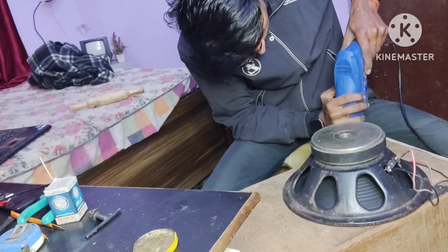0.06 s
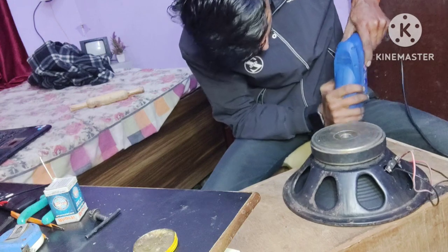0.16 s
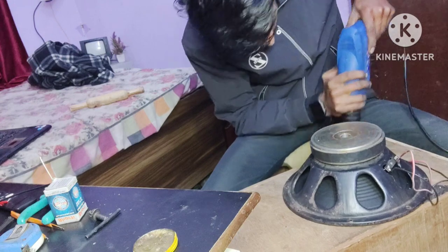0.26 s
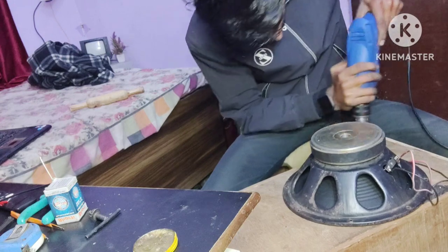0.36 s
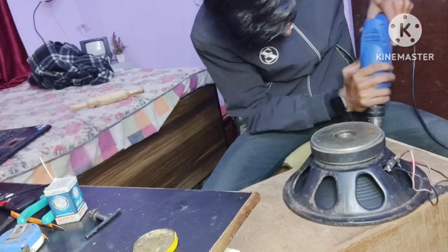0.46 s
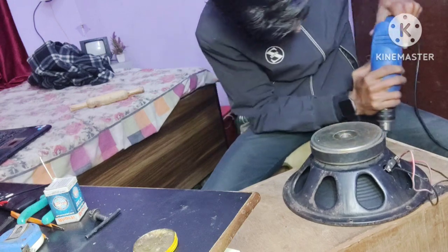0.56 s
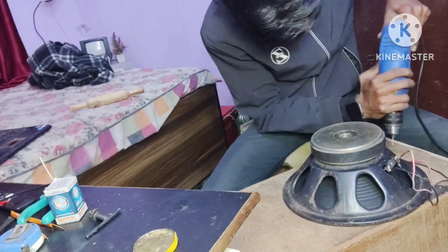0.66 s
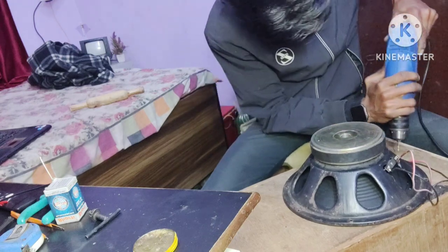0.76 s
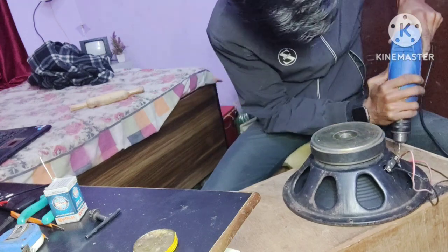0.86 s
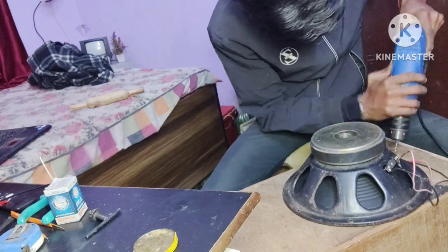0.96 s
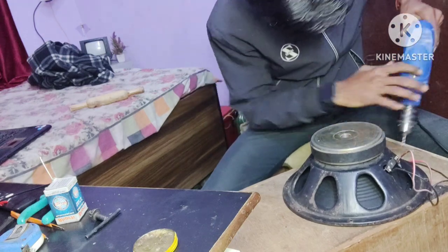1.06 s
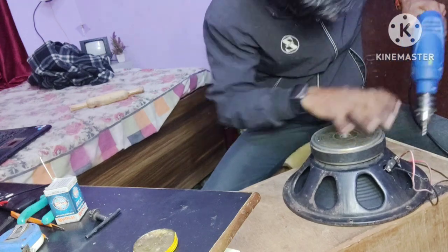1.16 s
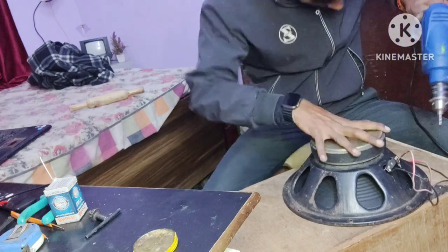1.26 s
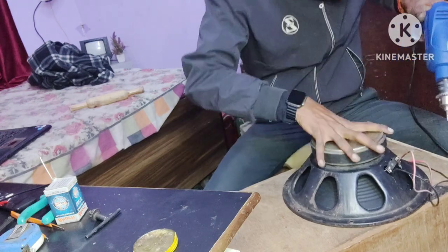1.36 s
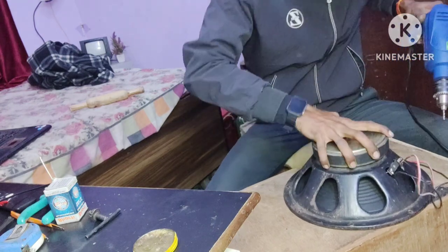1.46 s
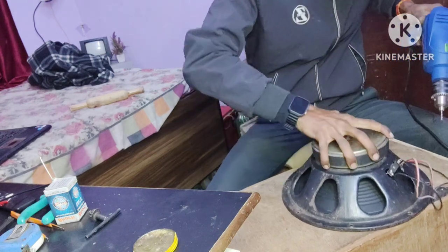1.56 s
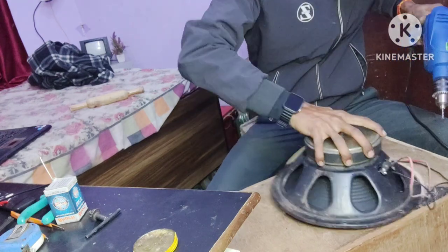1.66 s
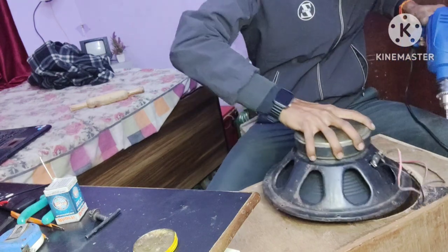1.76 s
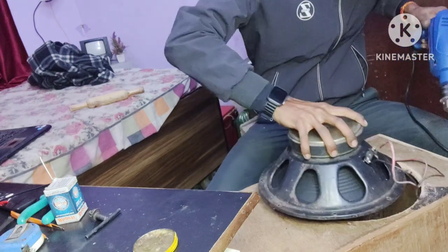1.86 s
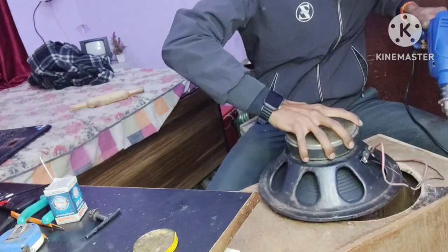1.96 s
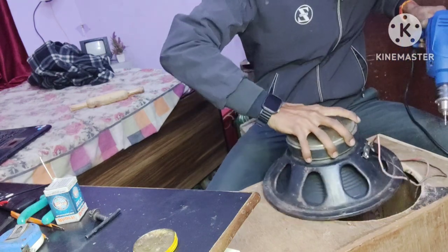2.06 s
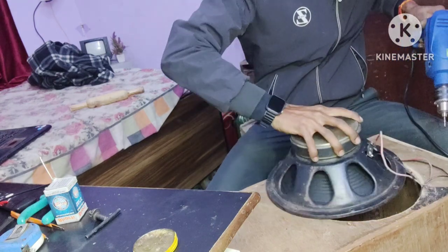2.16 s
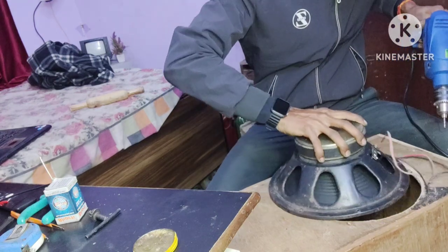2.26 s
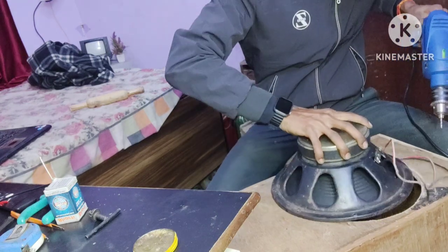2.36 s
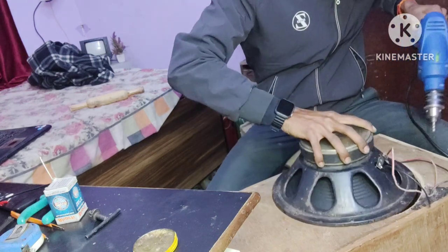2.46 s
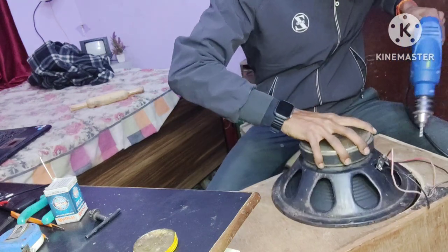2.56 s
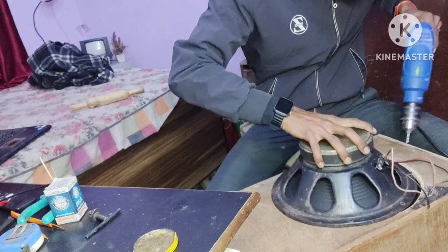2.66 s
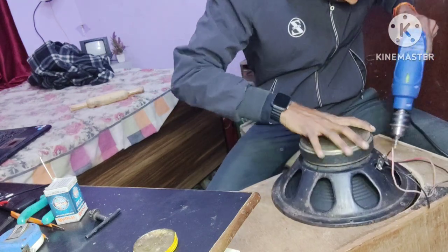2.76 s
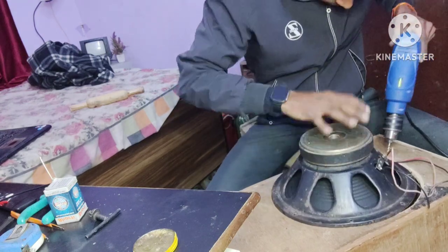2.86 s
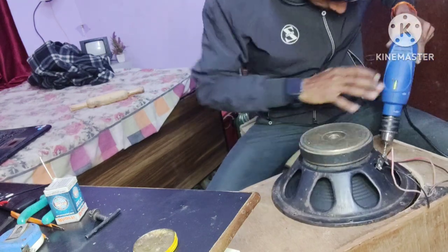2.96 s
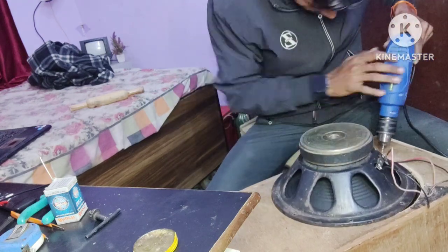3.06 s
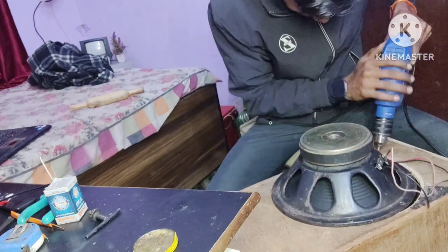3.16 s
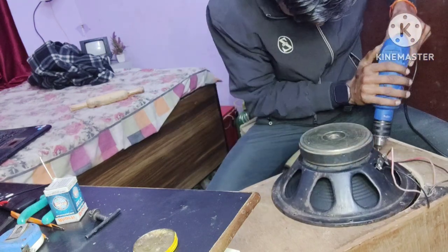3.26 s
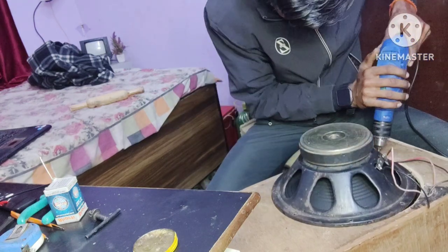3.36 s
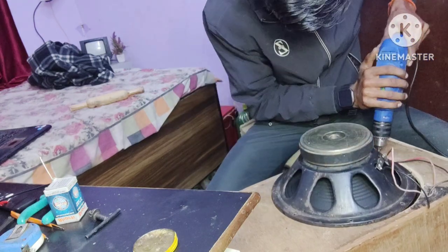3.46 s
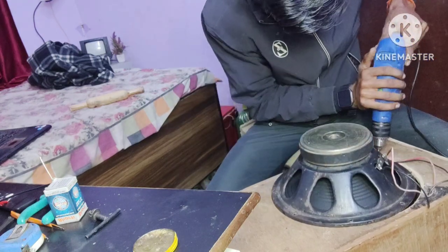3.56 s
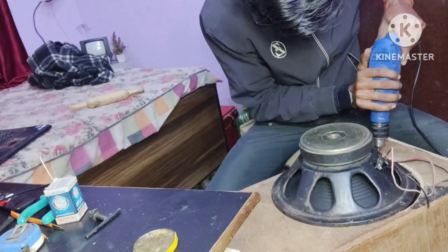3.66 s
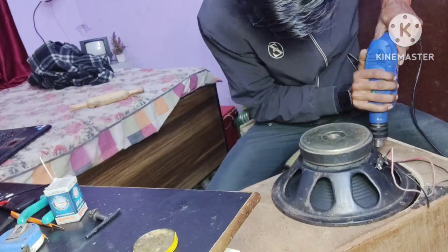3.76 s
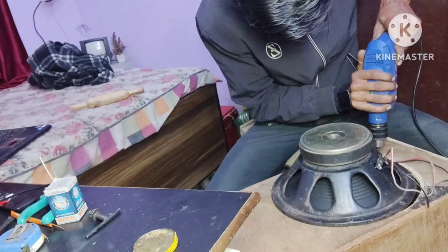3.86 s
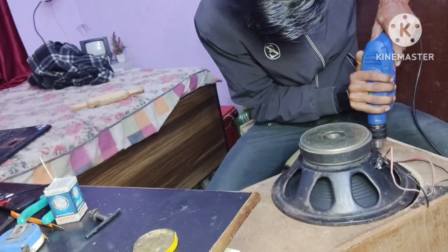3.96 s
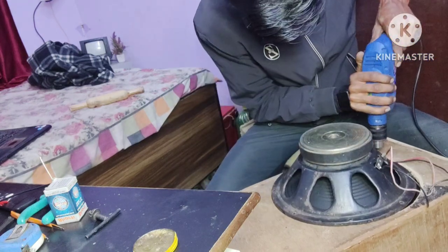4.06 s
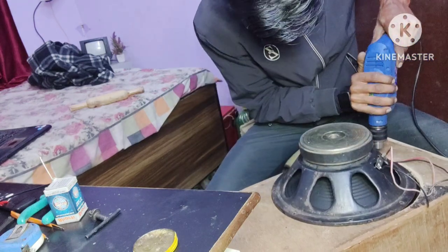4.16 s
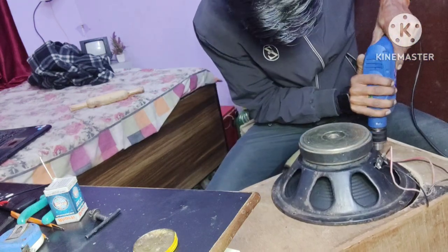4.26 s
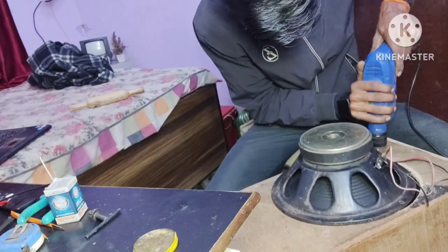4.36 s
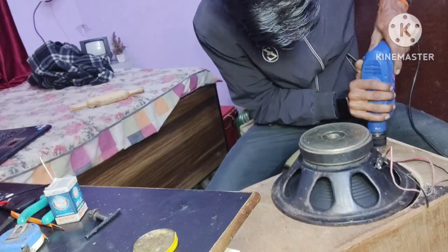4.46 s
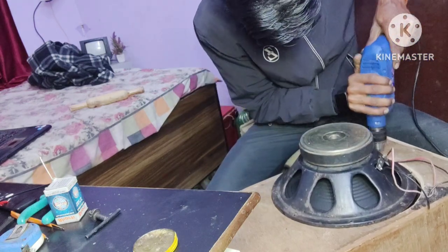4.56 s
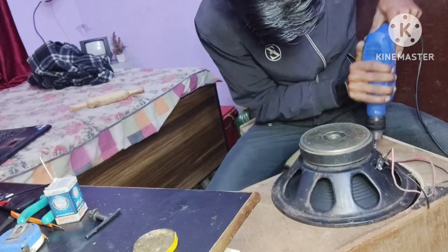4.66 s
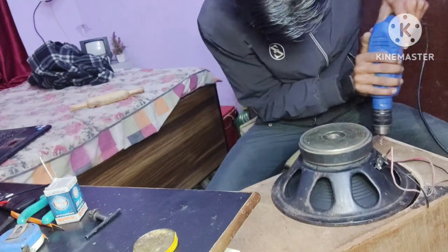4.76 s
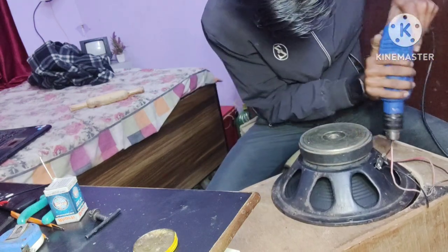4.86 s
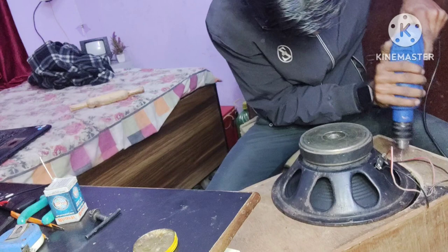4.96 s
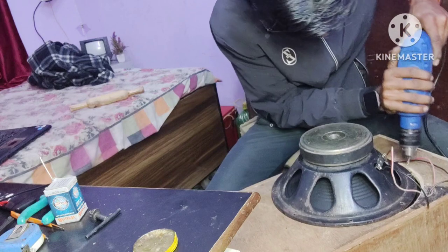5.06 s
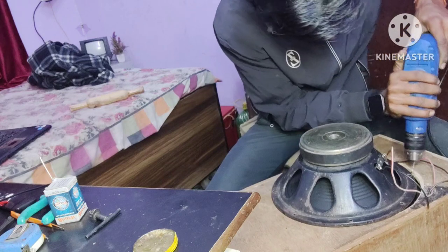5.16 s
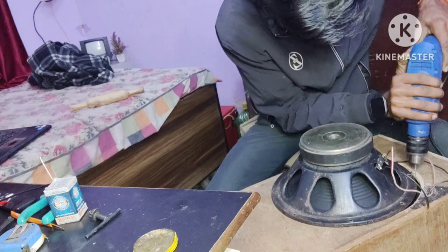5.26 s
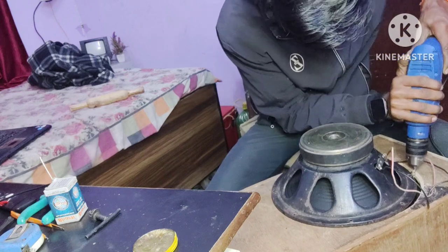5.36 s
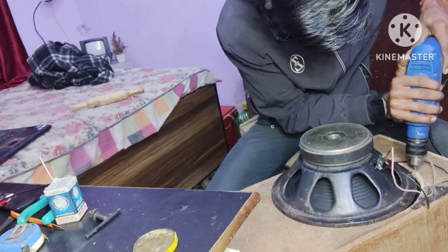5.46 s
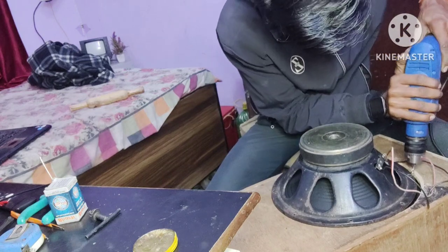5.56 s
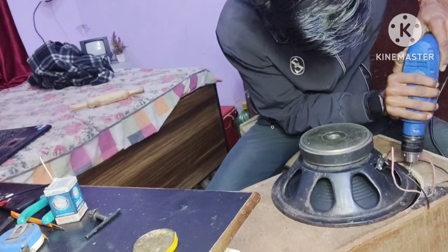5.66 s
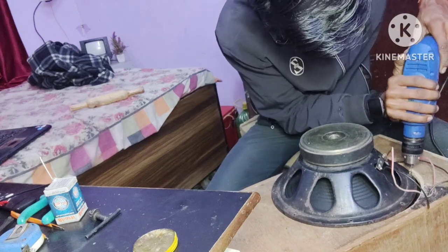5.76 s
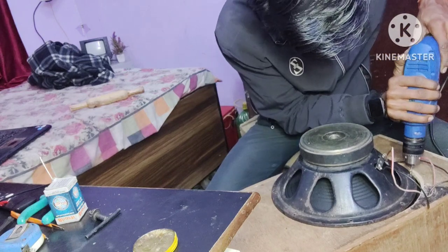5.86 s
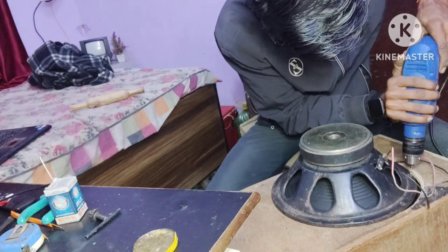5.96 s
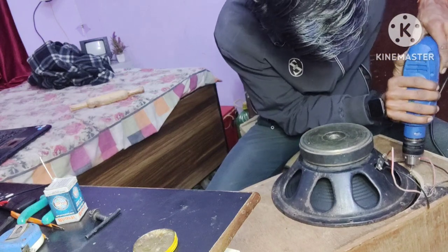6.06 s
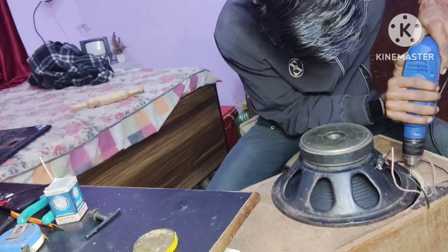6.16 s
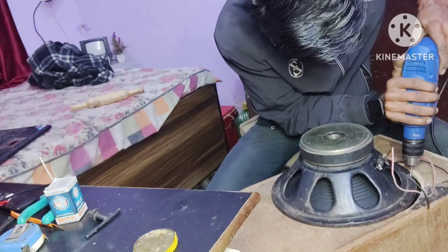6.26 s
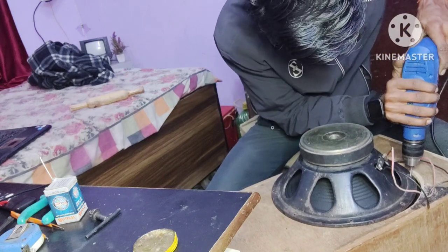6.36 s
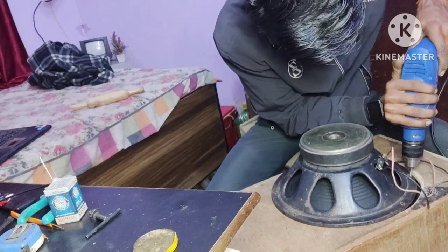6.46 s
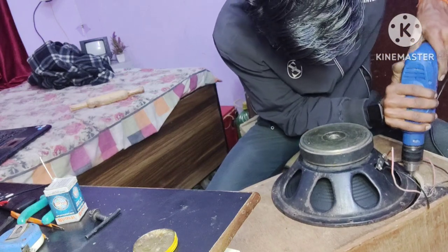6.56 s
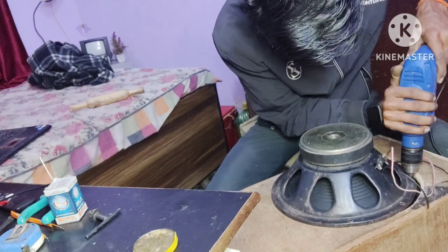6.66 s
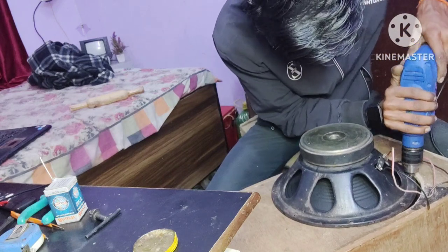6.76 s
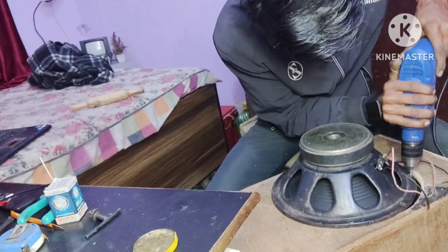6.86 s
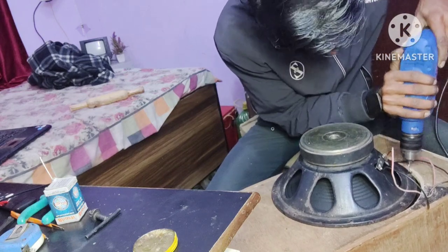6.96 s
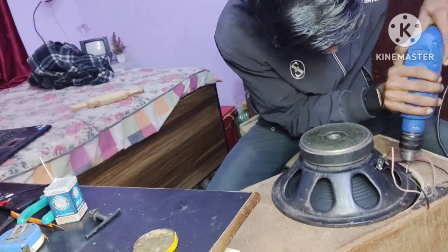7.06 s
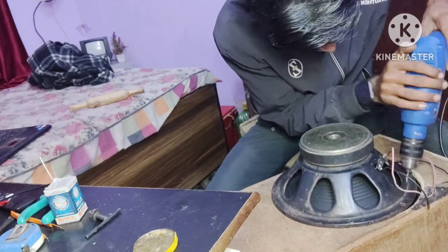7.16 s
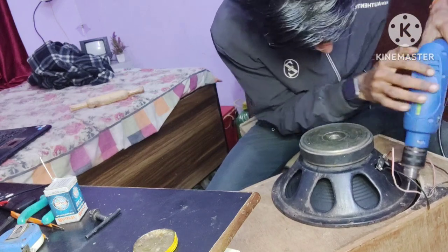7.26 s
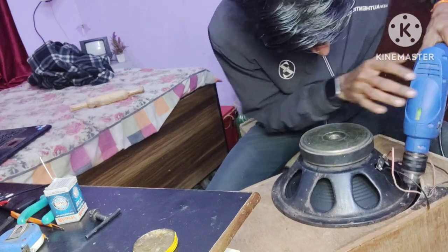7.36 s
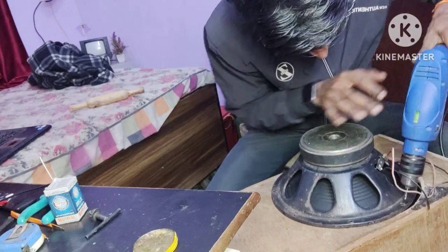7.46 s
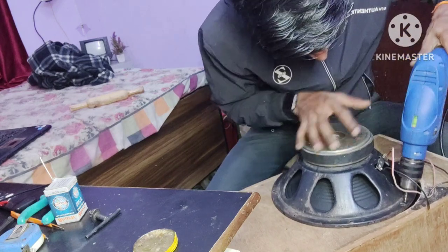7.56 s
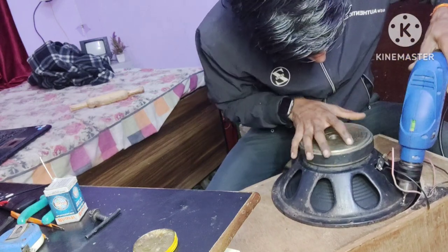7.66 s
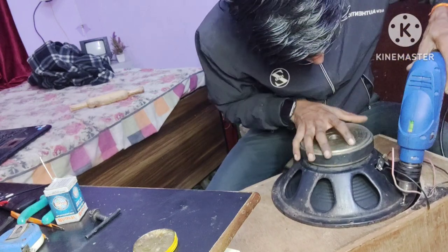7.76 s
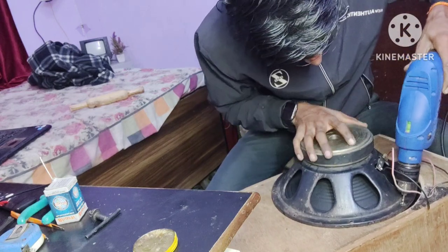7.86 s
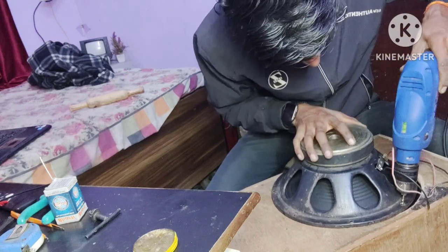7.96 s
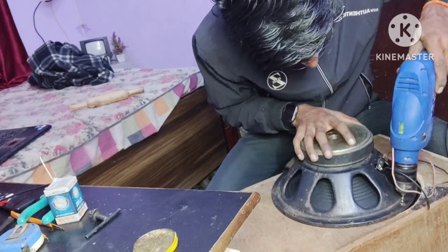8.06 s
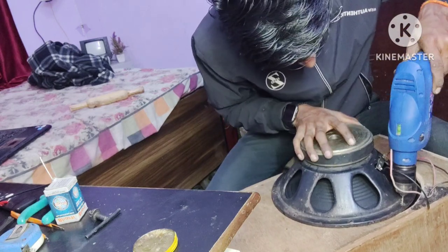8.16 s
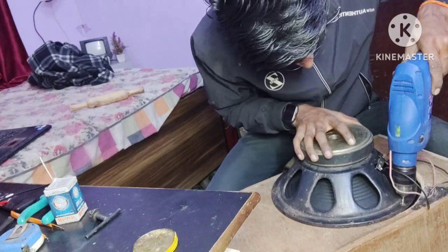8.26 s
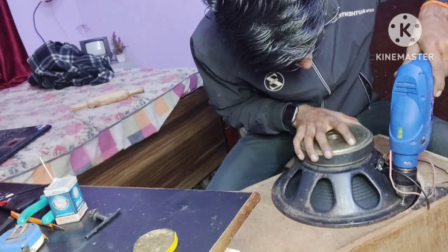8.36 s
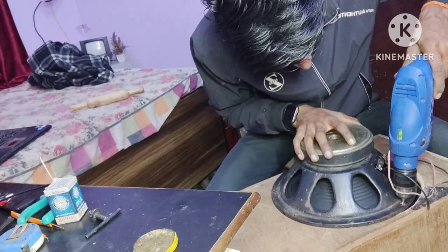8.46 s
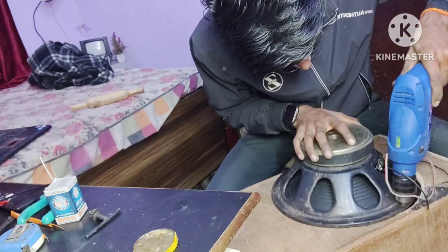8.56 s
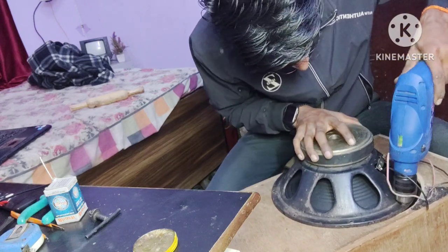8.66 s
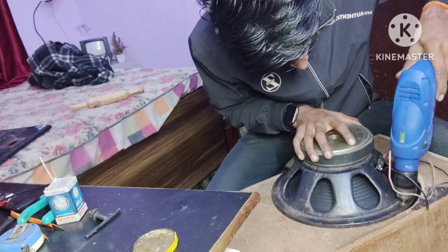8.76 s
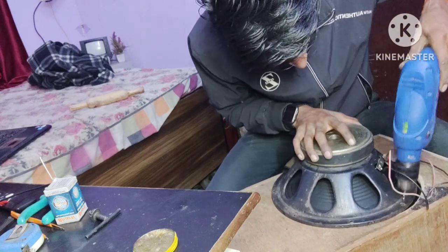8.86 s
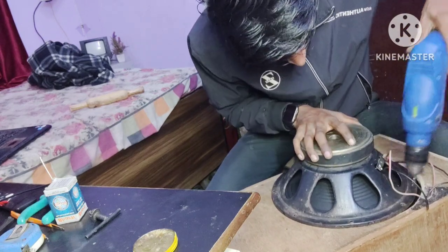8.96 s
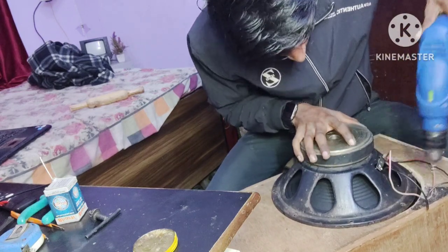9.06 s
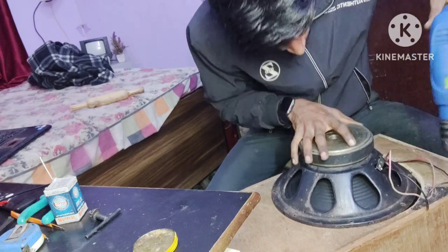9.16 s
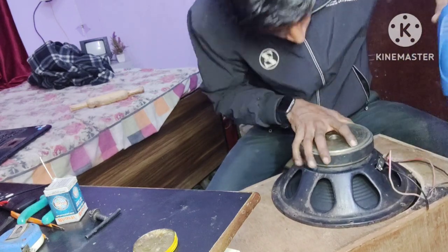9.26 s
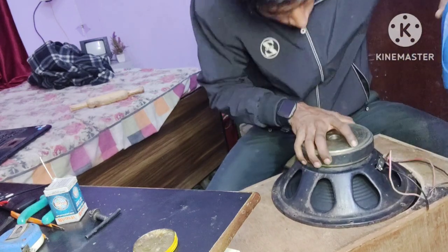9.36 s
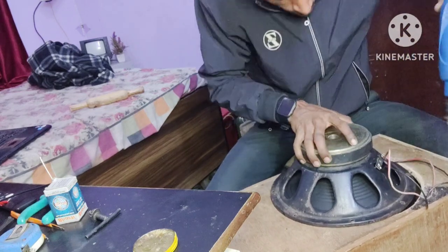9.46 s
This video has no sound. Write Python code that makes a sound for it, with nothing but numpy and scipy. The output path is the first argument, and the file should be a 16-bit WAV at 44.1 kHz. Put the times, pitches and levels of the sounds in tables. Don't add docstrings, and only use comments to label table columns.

```python
import sys
import numpy as np
from scipy import signal
from scipy.fft import rfft, irfft, next_fast_len
from scipy.io import wavfile
from scipy.ndimage import uniform_filter1d, map_coordinates

SR = 44100
rng = np.random.default_rng(int(sys.argv[2]) if len(sys.argv) > 2 else 0)


def unload_audio(sound):
    columns = np.transpose(np.atleast_2d(sound))
    steps = np.round(np.clip(columns, -1, 1) * 32767)
    wavfile.write(sys.argv[1], SR, steps.astype(np.int16))


def gain_from_db(level_db):
    decades = np.asarray(level_db, float) / 20
    return 10 ** decades


N = 419832
HOP = 32
LEFT_LAG, CABINET_LAG = 18, 5


# order per armature turn,
# resting level in dB over the noise.
WHINES = [(5, 4), (10, 4), (15, 5), (20, 2), (25, 2), (30, 3), (35, 2), (40, 3), (24, 8), (48, 15),
          (72, 15), (96, 15), (120, 13), (144, 12), (168, 11)]
# frequency in Hz, level in dB per Hz.
GEAR_TONE = [(150, -27), (250, -18), (293, -31), (541, -5), (696, 5.5), (1090, -0.5), (1450, 0.5),
             (1810, -3), (2180, 1), (2490, -8), (2810, 1), (3250, -2), (6000, -17.5), (7800, -47),
             (13200, -120)]
# frequency in Hz, level in dB per Hz.
BRUSH_TONE = [(2060, -32), (3500, 0.5), (3790, -0.5), (5360, -4.5), (6620, -6), (7220, -9), (8420, -7.5),
              (9590, -21), (11500, -9), (14700, -7.5), (15400, -8)]
# frequency in Hz, width in Hz, height in dB.
HOUSING = [(1610, 470, 6.5), (2260, 690, 4.5), (2780, 900, 3.5), (3835, 370, 4.5)]


def drill():
    speed, since, (level_db, _, ringing_order, ringing_db) = motor()
    turns = np.cumsum(speed * (1 + 0.003 * wander(60))) / SR
    beat = 1 + 0.041 * np.cos(2 * np.pi * turns) + 0.11 * wander(25)
    shared = 0.21 * lagged(rng.standard_normal(N) + 0.5 * blows(2300, 5.9))
    drive = beat * (shared + 0.96 * rng.standard_normal((2, N)))

    whine = np.zeros(N)
    for order, db in WHINES:
        buried_db = 0
        if order > 40:
            buried_db = 5 * np.clip((6000 - order * speed) / 2000, 0, 1) + 5 * np.exp(-since / 0.2)
        size = gain_from_db(db - buried_db + 2 * wander(20))
        if order in FLARING:
            carried_db = ringing_db * (ringing_order == order)
            size += flare(order, speed, carried_db) * gain_from_db(2 * wander(6) + 2.5 * wander(45))
        audible = order * speed < 16000
        whine += size * audible * np.cos(2 * np.pi * order * turns)
    runout = 1 + 0.4 * np.cos(2 * np.pi * turns) + 0.3 * wander(120)
    drive += room(gain_from_db(-25) * runout * whine, -3.0)

    def gear_db(f):
        return read(GEAR_TONE, f, left=-57, right=-52.5) + bumps(HOUSING, f) - 3.8 * (f < 1000)

    gears = colour(drive, gear_db)
    hiss = colour(drive, lambda f: read(BRUSH_TONE, f, left=-52.5, right=-59.0))
    gears *= loudness(speed, since, level_db, layer=0) / band_rms(gears, 1200, 4500)
    hiss *= loudness(speed, since, level_db, layer=1) / band_rms(hiss, 4500, 15000)
    return gain_from_db(1.5) * gears + gain_from_db(-2.0) * hiss


FRICTION = 165
# trigger pulled in seconds, released in seconds, free speed in turns/s,
# spin-up time in seconds, air drag in 1/s.
BURSTS = [
    (-.6, .067, 325, .16, .845),
    (3.98, 4.588, 324, .15, .78),
    (6.253, 6.829, 324, .187, .77),
    (8.217, 8.785, 337, .165, .7),
]
# level in dB, shaking of the cabinet in dB.
GRIPS = [(1, 1), (-0.1, 0.2), (-0.2, 0.9), (0.4, -2.5)]
# order, extra level in dB.
RINGING = ((15, 9), (10, 4), (10, 2), (5, 5))


def motor():
    t, speed, since, held = np.arange(N) / SR, np.zeros(N), np.zeros(N), np.zeros((4, N))
    for (pull, release, free, spin_up, drag), grip, ringing in zip(BURSTS, GRIPS, RINGING):
        now = t >= pull
        coast = np.maximum(t[now] - release, 0)
        powered = np.minimum(t[now], release) - pull
        climbed = free * (1 - np.exp(-powered / spin_up))
        slowed = (climbed + FRICTION / drag) * np.exp(-drag * coast) - FRICTION / drag
        speed[now] = np.maximum(slowed, 0)
        since[now] = coast
        held[:, now] = np.array([*grip, *ringing])[:, None]
    return uniform_filter1d(speed, size=1300), since, held


# speed in turns/s, gear and housing noise in dB, brush hiss in dB.
LOUDNESS = [(0, -61, -75.5), (8, -53.5, -60.5), (24.7, -48.5, -51), (59, -41, -45), (202.4, -29, -36.5),
            (337, -21.5, -26.5)]
# gears in dB, brushes in dB.
POWERED_DB = (1.64, 0.5)


def loudness(speed, since, level_db, layer):
    law = np.transpose(LOUDNESS)
    db = np.interp(speed, law[0], law[layer + 1]) + level_db + POWERED_DB[layer] * np.exp(-since / 0.029)
    linger_s = 0.01
    keep = np.exp(-1 / (linger_s * SR))
    return signal.lfilter([1 - keep], [1, -keep], gain_from_db(db), zi=[keep * gain_from_db(db[0])])[0]


# frequency in Hz, width in Hz, flare in dB over the noise.
RESONANT = [(1380, 420, 10), (2050, 340, 11), (2800, 460, 9), (3750, 900, 9), (6700, 1300, 12)]
FLARING = {5: -4, 10: -4, 15: -4, 20: -7, 24: -4}


def flare(order, speed, carried_db):
    hz = order * speed[::HOP]
    near = sum(gain_from_db(db) * np.exp(-(2 * (hz - centre) / width) ** 2) for centre, width, db in RESONANT)
    return np.repeat(near, HOP)[:N] * gain_from_db(FLARING[order] + carried_db)


def cabinet():
    return signal.lfilter(*signal.butter(2, 4000, fs=SR), judder() + thuds())


# frequency in Hz, width in Hz, level in dB.
BOX = [(35, 32, -17.5), (51.3, 30.4, -3), (107, 14, 1)]
# frequency in Hz, width in Hz, level in dB.
PANELS = [(146.4, 9, -1.5), (209, 41, -0.5), (267.3, 18, 1), (306, 41, -1)]
# frequency in Hz, width in Hz, level in dB.
FRAME = [(385, 57, -1.5), (523, 71, 1), (617, 96, 1), (834, 125, 2.5), (986, 53, -6.5), (1157, 44, -13.5),
         (1960, 220, -26)]
# start in seconds, hold in seconds, box boom in dB,
# panel drumming in dB, frame rattle in dB.
JOLTS = [(-.05, 0.18, -26, -25, -22), (.25, 0.19, -45.5, -53, -49), (1.345, 0.018, -43, -42.5, -55),
         (1.5, .25, -46, -51, -51.5), (2.274, 0.07, -50, -42.5, -52.5), (2.38, 0.081, -26, -27.5, -40.5),
         (2.596, 0.059, -39, -40.5, -47.5), (3.433, 0.062, -48, -52.5, -49), (4.116, .05, -35, -36, -39.5),
         (4.483, 0.052, -24, -21.5, -16.5), (4.647, 0.25, -45.5, -51, -53), (5.5, 0.058, -41, -47.5, -47),
         (5.902, .04, -40.5, -40.5, -46), (6.733, .06, -24.5, -24.5, -21.5), (6.837, 0.098, -34, -30, -28),
         (7.774, .04, -39, -38, -41), (8.683, .12, -27, -19.5, -21)]
RUNNING_DB = (-38, -33.5, -37)
SETTLE_DB_PER_S = (53, 42, 22)
REST_DB = (-60.5, -56, -51.5)
JOLT_RISE_S = (0.028, 0.013, 0.0024)
JOLT_FALL_DB_PER_S = (227, 216, 275)


def judder():
    out = np.zeros(N)
    speed, since, (_, shake_db, _, _) = motor()
    full_speed = 320
    parts = ((BOX, 150, -0.77), (PANELS, 300, -0.12), (FRAME, 700, 2.1))  # modes, blows per s, dB
    for k, (modes, per_s, db) in enumerate(parts):
        running = gain_from_db(RUNNING_DB[k] + shake_db - SETTLE_DB_PER_S[k] * since)
        level = gain_from_db(REST_DB[k]) + speed / full_speed * running
        for s, hold, *parts_db in JOLTS:
            jolt = swell(s, JOLT_RISE_S[k], hold, parts_db[k], JOLT_FALL_DB_PER_S[k])
            level = np.maximum(level, jolt)
        dying = np.sqrt(np.minimum(level / gain_from_db(-44.5), 1))
        shaken = level * dying * blows(per_s, 2.42)
        out += gain_from_db(db) * shaken.std() * ring(shaken, modes)
    return out


# start in seconds, peak in dB, pitch in Hz.
THUDS = [(1.349, -31.5, 134), (2.275, -31, 120), (2.389, -26, 75.4), (3.448, -34, 98), (5.915, -26.5, 98.5),
         (7.8, -30.5, 89), (7.804, -29, 383), (8.7, -9, 391)]


def thuds():
    out, t = np.zeros(N + 4000), np.arange(4000) / SR
    for s, db, hz in THUDS:
        out[round(s * SR):][:4000] += gain_from_db(db - 2.5 - 60 * t / 0.14) * np.sin(2 * np.pi * hz * t)
    return out[:N]


# start in seconds, peak in dB, relative treble in dB.
KNOCKS = [(1.6247, -42, -3), (1.6906, -40, -26), (1.734, -43, -10), (2.2682, -43, -28), (2.2887, -35, -22),
          (2.3857, -32, -20.5), (2.4212, -29, -53), (3.8094, -42.5, -1.5), (4.4886, -5, -21),
          (6.096, -42, -4), (6.747, -9, -9), (7.794, -22, -14), (8.1276, -36, 0.5), (8.6894, -11, -3),
          (8.7796, -13, -20)]


def knocks():
    size = 2600
    t, dull, bright = np.arange(size) / SR, np.zeros(N + size), np.zeros(N + size)
    for s, db, treble_db in KNOCKS:
        puff = rng.standard_normal(size)
        at = slice(round(s * SR), round(s * SR) + size)
        dull[at] += gain_from_db(db - 60 * t / 0.07) * puff
        bright[at] += gain_from_db(db + treble_db - 60 * t / 0.013) * puff

    def tap_db(f):
        return read([(300, -33), (900, 3.0), (3000, -0.5), (6000, -32)], f) + bumps([(1990, 260, 3)], f)

    tap = colour(dull[:N], tap_db)
    tick = colour(bright[:N], lambda f: read([(2500, -36), (5000, 10), (14000, -14.5)], f))
    return gain_from_db(7.5) * tap + gain_from_db(-2.5) * tick


RUB_FALL_DB_PER_S = 158
# start in seconds, rise in seconds, hold in seconds, level in dB.
SCRAPE = [
    (1.45, .28, .3, -67),
    (2.25, 0.028, .012, -53),
    (2.37, 0.079, 0.026, -50),
    (2.53, 0.037, .04, -47.5),
]
# frequency in Hz, level in dB per Hz.
SCRAPE_TONE = [(590, -33), (1000, 0), (1090, -7), (1300, 4), (1930, 0), (3880, -3.5), (4550, -16),
               (6000, -27), (7800, -59), (13200, -120)]


def scrape():
    grit = colour(blows(1500, 5.0), lambda f: read(SCRAPE_TONE, f, left=-60, right=-60))
    return sum(swell(*row, RUB_FALL_DB_PER_S) for row in SCRAPE) * evened(grit)


# start in seconds, rise in seconds, hold in seconds, level in dB.
RUSTLE = [
    (2.543, 0.032, 0.025, -51.5),
    (3.077, 0.084, 0.37, -59.5),
    (3.8, .008, 0.074, -65),
    (3.9, 0.071, .02, -50),
    (8.118, .008, .11, -51),
]


def rustle():
    cloth = colour(rng.standard_normal(N), lambda f: read([(3000, -15), (6000, 3), (14000, -12)], f))
    return gain_from_db(-11.0) * sum(swell(*row, RUB_FALL_DB_PER_S) for row in RUSTLE) * evened(cloth)


# frequency in Hz, t60 in seconds.
ROOM = [(100, 0.49), (1000, 0.43), (5000, 0.37), (15000, 0.051)]


def room(x, wet_db, lag=LEFT_LAG):
    taps = np.zeros((2, SR // 2))
    slots = np.arange(100, SR // 2 - 20, 20)
    at = slots + rng.integers(0, 20, (2, len(slots)))
    np.put_along_axis(taps, at, rng.choice([-1., 1.], at.shape), 1)
    hz, t, z = signal.stft(taps, SR, nperseg=256)
    z[1] = np.where(hz[:, None] < 100, z[0], z[1])
    tail = signal.istft(z * gain_from_db(-60 * t / read(ROOM, hz)[:, None]), SR, nperseg=256)[1]
    tail *= gain_from_db(wet_db) / np.linalg.norm(tail[0])
    wet = signal.oaconvolve(x[None], tail, axes=1)[:, :N]
    return (lagged(x, lag) + wet) / np.sqrt(1 + gain_from_db(2 * wet_db))


# frequency in Hz, level in dB per Hz.
AIR = [(12, -27), (20, 4.5), (98, -32), (201, -12.5), (265, -29), (402, -28.5), (611, -12.5), (722, -7.5),
       (784, -10), (1130, -21), (2900, -33), (4780, -58.5), (8560, -69), (10100, -57), (15400, -50.5)]
# frequency in Hz, left-right likeness from -1 to 1.
SAME = [(60, 0.59), (180, 1), (540, 0.64), (1640, -0.41), (4950, 0.56), (14900, -0.42)]
# frequency in Hz, level in dB.
FAN = [(629.8, -57), (716.0, -42.5), (942.1, -58), (2869, -69.5), (3187, -72)]
# frequency in Hz, level in dB.
SUPPLY = [(15052, -77.5), (15251, -68), (15353, -80.5)]


def fan():
    frames, hz = N // 256 + 5, np.fft.rfftfreq(1024, 1 / SR)
    a, b, c, d, patches = rng.standard_normal((frames, 513, 5)).T
    patches = evened(uniform_filter1d(uniform_filter1d(patches, 8, 0), 12, 1))
    same = np.clip(read(SAME, hz), -1, 1)[:, None]
    left = a + 1j * b
    right = same * left + np.sqrt(1 - same ** 2) * (c + 1j * d)
    z = np.array([left, right]) * gain_from_db(read(AIR, hz)[:, None] + 1.5 * patches)
    wash = signal.istft(z, nperseg=1024, noverlap=768)[1][:, :N]
    out = gain_from_db(-43.0) * evened(wash)
    for lines, drift, tilt_db in ((FAN, 0.0025, -0.4), (SUPPLY, 0.0002, 5.0)):
        for tone_hz, db in lines:
            phase = 2 * np.pi * np.cumsum(tone_hz * (1 + drift * wander(12))) / SR
            size = np.sqrt(2) * gain_from_db(db + 0.4 * wander(17))
            tone = size * np.array([np.cos(phase), np.cos(phase + 0.26)])
            out += tone * gain_from_db(np.array([[tilt_db], [-tilt_db]]))
    return out


def evened(x):
    return x / np.sqrt(np.mean(x ** 2) + 1e-20)


def read(points, hz, **ends):
    f, value = np.transpose(points)
    return np.interp(np.log(hz + 1), np.log(f + 1), value, **ends)


def colour(x, db):
    n = next_fast_len(N + 4096)
    return irfft(rfft(x, n) * gain_from_db(db(np.fft.rfftfreq(n, 1 / SR))), n)[..., :N]


def band_rms(x, lo, hi):
    band = colour(x, lambda f: np.where((f > lo) & (f < hi), 0, -200))
    return np.sqrt(np.mean(band ** 2))


def wander(per_s):
    knots = rng.standard_normal(int(N / SR * per_s) + 3)
    return map_coordinates(knots, [np.arange(N) / SR * per_s], order=1)


def ring(x, modes):
    out = 0
    for k, (hz, width, db) in enumerate(modes):
        r = np.exp(-np.pi * width / SR)
        poles = [1, -2 * r * np.cos(2 * np.pi * hz / SR), r * r]
        out = out + (-1) ** k * gain_from_db(db) * evened(signal.lfilter([1, 0, -r], poles, x))
    return evened(out)


def blows(per_s, spread_db):
    size = gain_from_db(spread_db * np.minimum(rng.exponential(1, N), 4)) * rng.choice([-1., 1.], N)
    return evened(size * (rng.random(N) < per_s / SR))


def bumps(modes, f):
    return sum(db / (1 + (2 * (f - hz) / width) ** 2) for hz, width, db in modes)


def lagged(x, lag=LEFT_LAG):
    return np.array([np.roll(x, lag), x])


def swell(s, rise, hold, db, fall_db_per_s):
    t = np.arange(0, N, HOP) / SR - s
    fall_db = fall_db_per_s * np.clip(t - rise - hold, 0, 2)
    return np.repeat(np.clip(t / rise, 0, 1) ** 2 * gain_from_db(db - fall_db), HOP)[:N]


# frequency in Hz, left minus right in dB.
PORTS = [(60, -.3), (180, 0), (310, 1.5), (540, -3), (1640, -0.5), (2850, -1.5), (4950, 4), (8580, 26),
         (14900, 9)]


def scene():
    handling = scrape() + rustle() + knocks()
    near = drill() + room(gain_from_db(-2.5) * handling, 2.0) + room(cabinet(), -6.5, CABINET_LAG)
    ports = colour(near, lambda f: np.array([[0.5], [-0.5]]) * read(PORTS, f))
    return ports + fan()


def low_pass(x):
    return signal.sosfilt(signal.butter(12, 15580, fs=SR, output="sos"), x)


def record(dry):
    mix = np.clip(dry, -1, 1)
    return low_pass(mix)


dry = scene()
out = record(dry)
unload_audio(out)
```